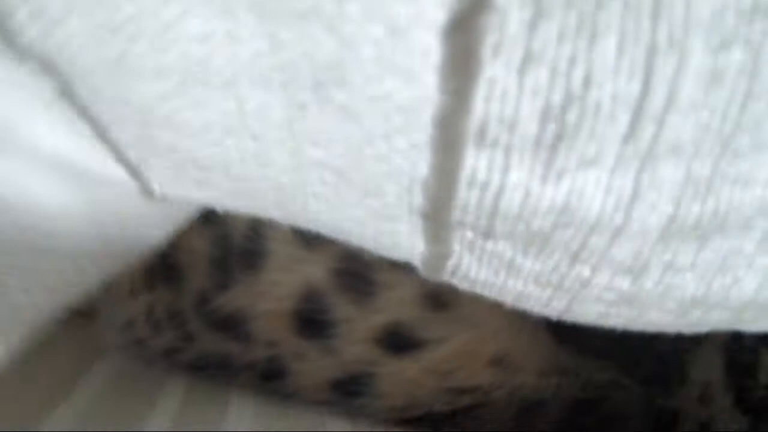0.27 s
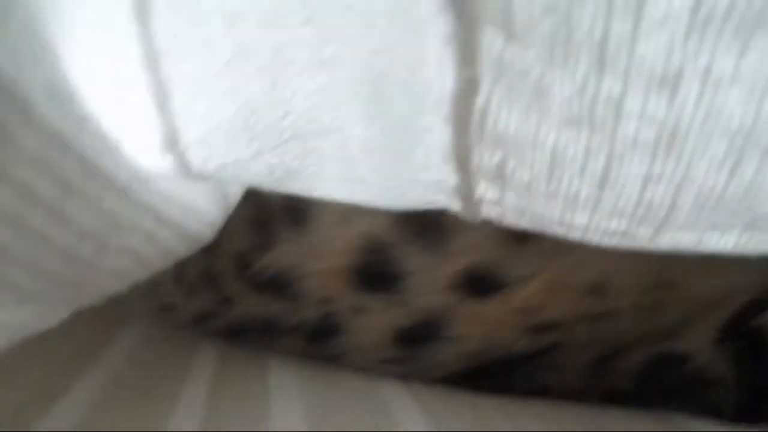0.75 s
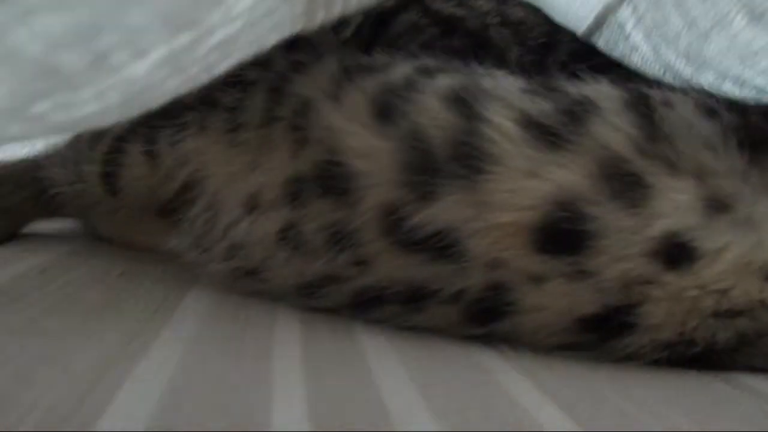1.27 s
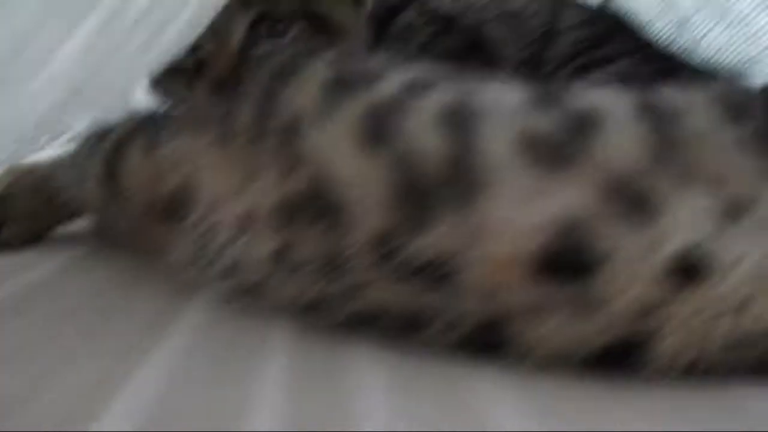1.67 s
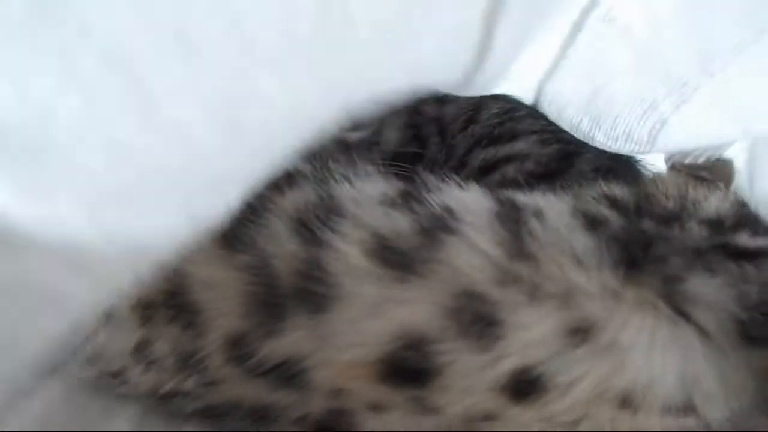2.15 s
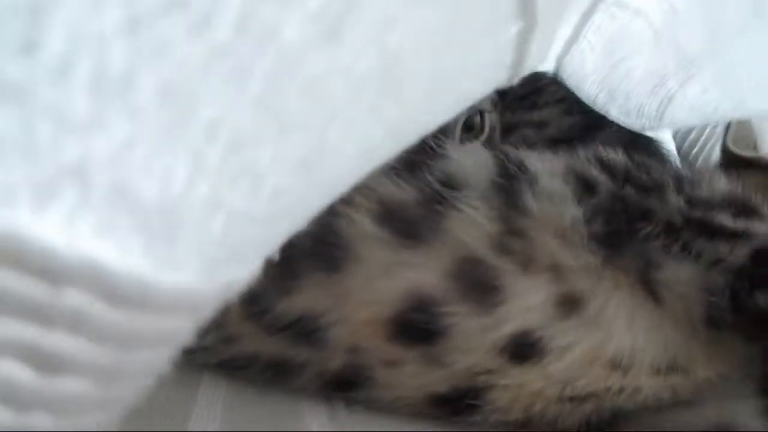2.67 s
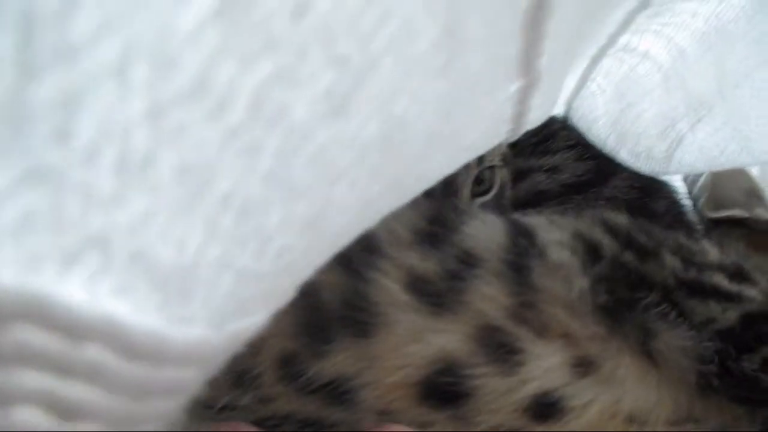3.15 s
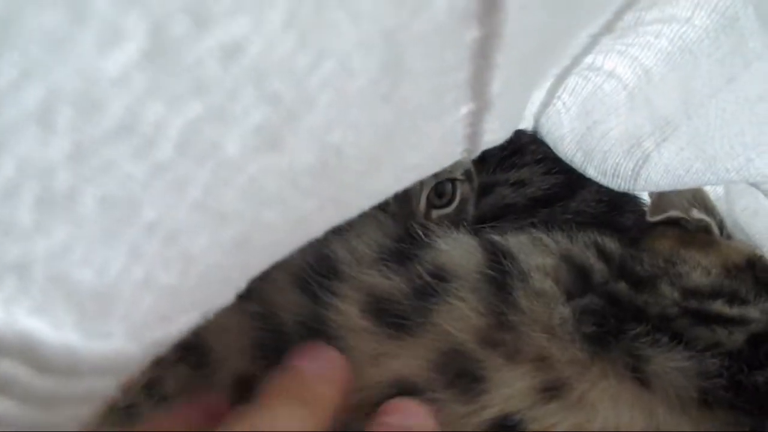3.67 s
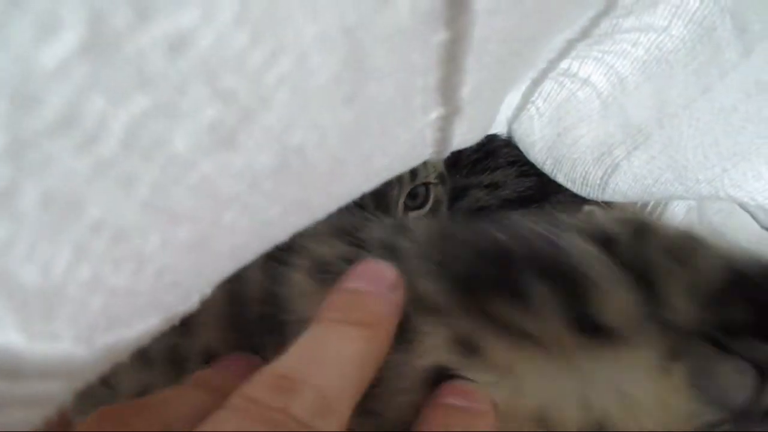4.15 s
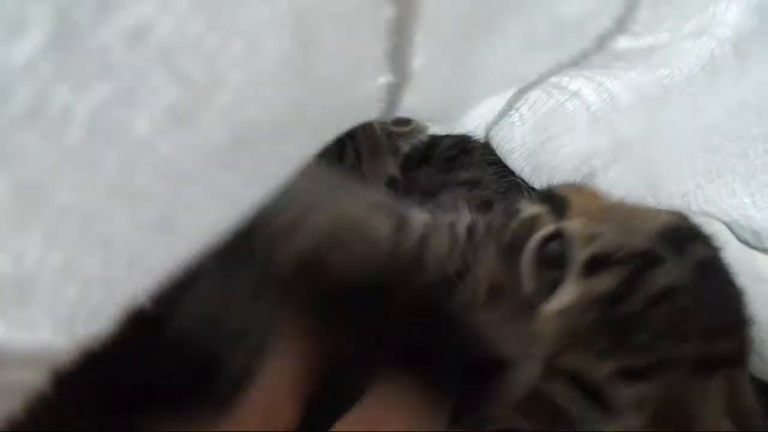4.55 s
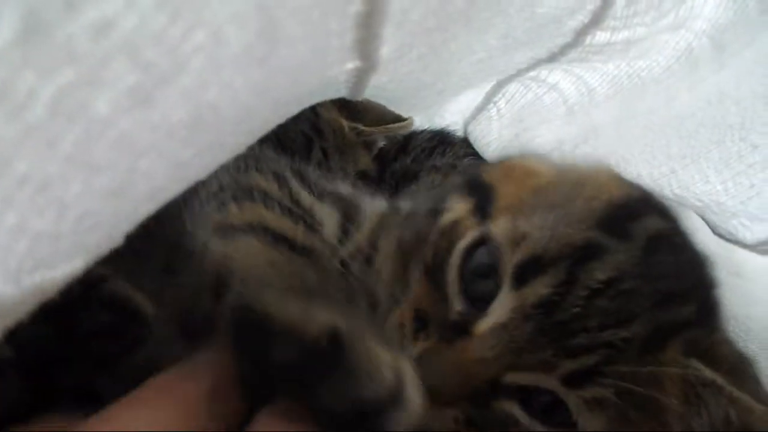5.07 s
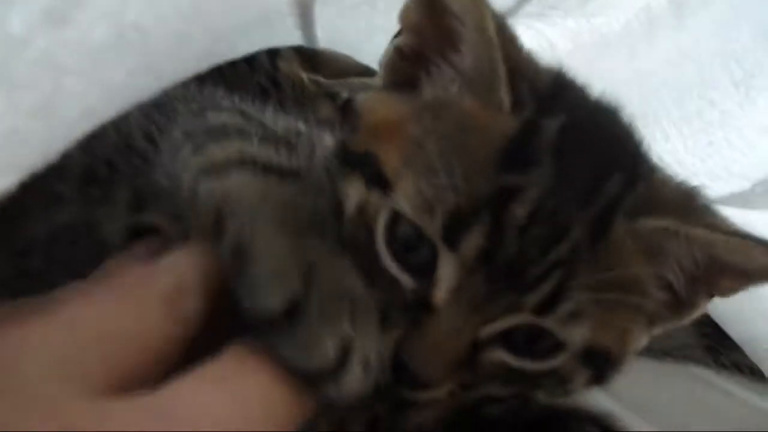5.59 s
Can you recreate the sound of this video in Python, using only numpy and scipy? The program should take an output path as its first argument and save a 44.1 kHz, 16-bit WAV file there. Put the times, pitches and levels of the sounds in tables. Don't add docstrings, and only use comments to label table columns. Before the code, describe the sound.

Very close under a sheet indoors, cloth drags over a small microphone with dry scrapes and low bumps. Dull knocks come first, then hard plastic cracks near one second and again after two and a half, the loudest distorting. After three seconds it calms to soft rustles of fingers in fur, with a few muffled knocks around four and a half. Constant hiss underneath.

```python
import sys
import numpy as np
from scipy import signal
from scipy.fft import rfft, irfft, next_fast_len
from scipy.io import wavfile
from scipy.ndimage import uniform_filter1d

SR = 44100
rng = np.random.default_rng(int(sys.argv[2]) if len(sys.argv) > 2 else 0)


def boost_factor(decibels):
    exponent = np.asarray(decibels, float) / 20
    return 10 ** exponent


def digitize_waveform(pressure):
    field = np.atleast_2d(pressure).T
    bounded = np.clip(field, -1, 1)
    quanta = np.round(bounded * 32767).astype(np.int16)
    wavfile.write(sys.argv[1], SR, quanta)


N = 256662

# [peak t/s, rise/s, fall/s, scrape level/dB,
# push level/dB]
MOVEMENTS = [(0.0, .01, 0.041, -41, -36), (.09, .03, 0.065, -41, -39.5), (0.238, 0.019, 0.042, -38.5, -56),
             (.32, .04, 0.093, -41.5, -44.5), (.49, 0.027, 0.023, -38, -37.5),
             (.55, 0.048, 0.077, -36.5, -48.5), (0.671, 0.015, 0.04, -37.5, -49),
             (.865, 0.046, 0.061, -44, -43.5), (1.02, 0.058, 0.021, -44, -39.5),
             (1.085, 0.034, 0.023, -48, -41), (1.25, 0.0086, 0.013, -45, -68), (1.35, 0.038, 0.026, -48, -50),
             (1.676, 0.05, 0.041, -43.5, -57), (1.9, 0.14, 0.11, -45.5, -47.5), (2.04, 0.0078, 0.085, -28, -23),
             (2.115, 0.036, .03, -38.5, -32), (2.175, 0.027, 0.058, -26.5, -29),
             (2.36, 0.028, 0.061, -30.5, -29.5), (2.561, 0.025, 0.23, -35.5, -31),
             (2.69, 0.024, 0.0051, -20.5, -48), (2.743, .015, 0.033, -36.5, -43),
             (2.8, 0.023, 0.0091, -33, -45), (2.96, .13, 0.058, -36, -33),
             (3.1, 0.041, 0.3, -50, -40.5), (3.47, 0.043, 0.6, -49, -45.5), (3.8, 0.011, 0.15, -43.5, -43.5),
           (4.03, .03, 0.022, -43.5, -55), (4.12, 0.024, 0.034, -43.5, -71),
           (4.2, 0.044, 0.086, -44.5, -52), (4.37, 0.048, 0.11, -40.5, -46),
           (4.5, 0.046, 0.041, -41.5, -36.5), (4.68, 0.08, 0.019, -41.5, -51),
           (4.76, 0.031, 0.13, -43.5, -64), (4.93, 0.018, 0.024, -54, -52),
           (5.05, 0.032, 0.038, -43.5, -58), (5.31, 0.075, 0.022, -49, -41), (5.421, 0.0041, .05, -46, -41),
           (5.57, 0.027, 0.034, -61, -44.5), (5.72, 0.0083, 0.081, -52, -50)]
# [peak t/s, half length/s, level/dB]
SWAYS = [(.025, 0.017, -34), (0.185, 0.095, -29), (0.317, .07, -33.5), (.49, 0.057, -31),
         (1.02, 0.028, -30), (1.39, 0.083, -35), (1.56, .03, -38.5), (1.656, 0.048, -34.5),
         (1.893, 0.1, -40.5), (2.13, 0.045, -27), (2.284, 0.059, -34.5), (2.593, 0.091, -31.5),
         (2.9, 0.11, -38), (3.466, 0.093, -40.5), (4.37, 0.036, -37.5), (4.502, 0.024, -27),
         (4.636, 0.024, -32.5), (4.746, 0.03, -36), (5.092, 0.028, -42), (5.3, 0.042, -40),
         (5.82, 0.032, -44)]
# [f/Hz, level/dB]
SCRAPE_TILT = [(900, -11), (1500, 6), (3000, -3.5), (5000, 3.5), (7500, 2.5), (10000, -4), (15000, -7.5)]
# [t/s, panel peak level/dB, panel f/Hz, port peak level/dB, t60/s]
FLEXES = [
    (0.48, -37, 2500, -35, .02),
    (0.5052, -2, 2370, -7.5, 0.013),
    (1.0965, -10, 2160, -6.5, 0.025),
    (1.1227, -21, 1800, -17, 0.011),
    (1.5107, -21.5, 2250, -35, 0.019),
    (1.5219, -7, 2180, -15.5, 0.017),
    (1.5302, -12, 2083, -29, 0.041),
    (2.6575, -21, 2300, -1.5, 0.007),
]
# [t/s, panel peak level/dB, panel f/Hz, port peak level/dB, t60/s]
BREAKS = [
    (1.0954, -15, 1490, -26, 0.012),
    (1.0992, -0.5, 2870, -25, 0.011),
    (1.1009, -6, 2970, 1, 0.014),
    (1.1045, -5.5, 2310, -8.5, 0.0077),
    (1.1061, -3, 1840, -10, 0.017),
    (1.108, -17, 1850, -52, 0.023),
]
# [t/s, panel peak level/dB, panel f/Hz, port peak level/dB, t60/s]
SPLITS = [
    (2.6446, 0, 1762, 3, 0.027),
    (2.6472, -3.5, 2230, -4.5, 0.022),
    (2.652, -14, 2450, -9, 0.038),
    (2.66, -16, 2720, -15, 0.03),
    (2.6665, -13.5, 1100, -3, 0.013),
    (2.67, -20, 2300, -19, 0.045),
]
# [t/s, panel peak level/dB, panel f/Hz, port peak level/dB, fizz level/dB]
TICKS = [(0.511, -29, 2330, -41, -43), (0.517, -18, 2640, -38, -42), (0.544, -25, 2290, -38, -51),
         (0.554, -37, 2380, -30, -52), (0.568, -28, 2620, -20, -47), (0.682, -29, 1850, -44, -50),
         (1.016, -23.5, 1900, -29, -32), (1.178, -30, 1200, -37, -53), (1.204, -24.5, 2140, -31, -48),
         (1.2505, -26, 980, -45, -56), (1.6727, -23.5, 2540, -31, -38), (1.892, -26, 2210, -26, -39),
         (2.15, -31, 1480, -33, -35), (2.196, -31, 2360, -19, -49), (2.431, -30.5, 2300, -27, -50),
         (2.563, -28, 1890, -22, -53), (2.68, -22, 2310, -24, -23), (2.688, -22, 2330, -23, -44),
         (2.961, -28, 2270, -29, -49), (4.4905, -36, 1900, -34, -44), (4.588, -38, 2340, -29, -49),
         (4.746, -38, 2700, -28, -46)]
# [t/s, panel peak level/dB, panel f/Hz, fizz level/dB]
THUDS = [
    (.505, -35, 450, -45),
    (1.1003, -13, 903, -23),
    (2.5, -28, 2240, -48),
    (2.05, -22, 526, -38),
    (2.6452, -8.5, 900, -28),
]
# [t/s, peak level/dB, start f/Hz, t60/s]
KNOCKS = [(0.0983, -9, 267, 0.21), (.172, -18.5, 171, .4), (0.305, -19.5, 203, 0.27),
          (.349, -20, 109, 0.96), (2.027, -13.5, 162, 0.19), (4.385, -19.5, 136, 0.31),
          (4.481, -22, 111, .3), (4.5, -18, 100, 0.26), (4.58, -22.5, 91, 0.32), (5.3, -36, 199, .15),
          (5.417, -38, 263, .15)]
# [t/s, length/s, pitch f/Hz, level/dB]
SQUEAKS = [
    (2.6965, .023, 2470, -28),
]
# [t/s, length/s, port level/dB, fizz level/dB]
FLICKS = [
    (0.28, 0.031, -41, -49),
    (2.148, .012, -29, -43),
    (2.646, 0.039, -32, -26.5),
    (2.685, 0.04, -34, -38),
    (2.787, 0.029, -25, -33.5),
    (2.815, 0.0049, -39, -44),
    (4.489, 0.0055, -29, -39),
]
# [t/s, length/s, pitch f/Hz, level/dB]
HUMS = [
    (1.46, 0.096, 440, -45),
    (5.72, 0.11, 401, -47),
]
# [f/Hz, width/Hz, level/dB]
PORT = [(985, 180, -12), (1731, 230, -8), (2335, 128, -3), (2544, 166, -5), (2935, 230, -8),
        (3780, 86, -2.5), (4270, 270, 0), (4675, 170, -6), (5230, 91, -15), (6110, 130, -18.5),
        (6600, 410, -22.5), (8360, 240, -23.5), (9500, 580, -16.5), (10820, 218, -21)]
# [f/Hz, level/dB]
VALLEYS = [(30, -1), (80, -22), (230, -13.5), (450, -18.5), (1300, -29.5), (2000, -23), (3300, -19.5),
           (4600, -15), (5000, -24), (5600, -41), (8500, -29), (12000, -36), (15900, -37.5), (16200, -72)]
# [f/Hz, rms level/dB]
WHINE = [(2005, -70), (6012, -77), (8020, -77), (11370, -87)]

REST_SCRAPE_DB, REST_SWISH_DB, REST_PUSH_DB, REST_SWAY_DB = -48.5, -59, -56.5, -55.5
SWISH_FROM_PUSH, SWISH_DB = 0.63, -5.5
SWISH_GROWTH, SWISH_PIVOT_DB = 0.15, -36
SQUARENESS = 1.54
FLEX_FIZZ_DB, BREAK_FIZZ_DB, SPLIT_FIZZ_DB = -26, -11.5, -6.5
TICK_T60_S, THUD_T60_S, THUD_PORT_DB = 0.028, 0.019, -44
CRACK_TAPS = 2000
ROOM_DB = -41


def evened(x):
    return x / np.sqrt(np.mean(x ** 2) + 1e-20)


def peaked(x):
    return x / abs(x).max()


def read(points, hz):
    f, value = np.transpose(points)
    return np.interp(np.log(hz + 1), np.log(f + 1), value)


def add(mix, start_s, sound):
    part = mix[round(start_s * SR):][:len(sound)]
    part += sound[:len(part)]


def band(x, lo_hz, hi_hz, order=2):
    return signal.sosfilt(signal.butter(order, [lo_hz, hi_hz], "bandpass", fs=SR, output="sos"), x)


def coloured(x, gain):
    size = next_fast_len(len(x))
    spectrum = rfft(x, size) * gain(np.fft.rfftfreq(size, 1 / SR))
    return evened(irfft(spectrum, size)[:len(x)])


def port(hz):
    peaks = sum(boost_factor(2 * db) / (1 + (2 * (hz - f) / width) ** 2) ** 1.22 for f, width, db in PORT)
    return np.sqrt(boost_factor(-14.5) * peaks + boost_factor(2 * read(VALLEYS, hz)))


def flicker(size, depth_db):
    drift = uniform_filter1d(uniform_filter1d(rng.standard_normal(N), size), size)
    return boost_factor(depth_db * evened(drift))


def fibres(per_s, spread_db, smooth):
    size = boost_factor(spread_db * np.minimum(rng.exponential(1, N), 3.3))
    clicks = evened(size * (rng.random(N) < per_s / SR))
    return evened(clicks + smooth * rng.standard_normal(N))


def swell(peak_s, rise_s, fall_s, db):
    grid = np.arange(0, N + 64, 64)
    late_s = grid[:, None] / SR - peak_s
    shape = np.exp(-abs(late_s / np.where(late_s < 0, rise_s, fall_s)) ** SQUARENESS)
    level = np.sqrt(((boost_factor(db) * shape) ** 2).sum(axis=1))
    return np.interp(np.arange(N), grid, level)


def cloth():
    peak_s, rise_s, fall_s, scrape_db, push_db = np.transpose(MOVEMENTS)
    swish_db = scrape_db + SWISH_FROM_PUSH * (push_db - scrape_db) + SWISH_DB
    swish_db = swish_db + SWISH_GROWTH * (push_db - SWISH_PIVOT_DB)
    sway_s, half_s, sway_db = np.transpose(SWAYS)

    grip = flicker(size=150, depth_db=2.5)
    threads = coloured(fibres(2000, 4.2, 1.15),
                       lambda hz: port(hz) * boost_factor(read(SCRAPE_TILT, hz)) * (hz > 500))
    folds = boost_factor(-3.0) * evened(band(fibres(600, 5.2, 1.87), 133, 770))
    weight = band(band(fibres(150, 1.7, 0.72), 52, 326), 33, 127, order=1)
    weight = boost_factor(-2.0) * evened(weight)
    springs = boost_factor(-1.9) * evened(band(rng.standard_normal(N), 5.5, 34))
    push = weight * flicker(size=600, depth_db=2.0)
    layers = np.array([grip * threads, grip * folds, push, springs])

    rest = boost_factor(np.array([REST_SCRAPE_DB, REST_SWISH_DB, REST_PUSH_DB, REST_SWAY_DB])) @ layers
    levels = [swell(peak_s, rise_s, fall_s, db) for db in (scrape_db, swish_db, push_db)]
    levels.append(swell(sway_s, half_s, half_s, sway_db))
    return rest * flicker(size=2600, depth_db=2.5), (np.array(levels) * layers).sum(axis=0)


def crack(peak_db, hz, port_db, fizz_db, t60_s):
    t = np.arange(CRACK_TAPS) / SR
    noise = rng.standard_normal(CRACK_TAPS)
    burst = noise * boost_factor(-60 * t / (0.56 * t60_s))

    def mode(f_hz, share, life):
        return share * boost_factor(-60 * t / (life * t60_s)) * np.sin(2 * np.pi * f_hz * t)

    def rung(body):
        return signal.fftconvolve(burst, body)[:CRACK_TAPS]

    panel_modes = mode(hz, 0.86, 0.6) + mode(0.83 * hz, 0.16, 0.29)
    panel_modes = panel_modes + mode(1.39 * hz, 0.16, 0.2) + mode(1.57 * hz, 0.073, 0.24)
    panel = band(rung(panel_modes), 0.7 * hz, 1.66 * hz)
    cavity_modes = mode(4230, 1, 0.64) + mode(4786, 0.3, 0.46) + mode(4000, 0.98, 0.4)
    cavity = band(rung(cavity_modes), 2970, 5160)
    fizz = band(noise * boost_factor(-60 * t / (0.24 * t60_s)), 5900, 11400)
    thump = band(burst, 220, 560)
    return (boost_factor(peak_db) * peaked(panel) + boost_factor(port_db + 1.5) * peaked(cavity)
            + boost_factor(fizz_db + 3.5) * peaked(fizz) + boost_factor(fizz_db - 8.5) * peaked(thump))


def casing_hits():
    cracks = []
    for table, fizz_db in ((FLEXES, FLEX_FIZZ_DB), (BREAKS, BREAK_FIZZ_DB), (SPLITS, SPLIT_FIZZ_DB)):
        for s, db, hz, port_db, t60_s in table:
            cracks.append((s, db, hz, port_db, port_db + fizz_db, t60_s))
    ticks = [(*row, TICK_T60_S) for row in TICKS]
    thuds = [(s, db, hz, THUD_PORT_DB, fizz_db, THUD_T60_S) for s, db, hz, fizz_db in THUDS]
    return sorted(cracks) + ticks + thuds


def knock(peak_db, hz, t60_s):
    t = np.arange(0, 0.17, 1 / SR)
    turns = np.cumsum(hz * (0.24 + 0.79 * np.exp(-t / 0.0068))) / SR
    swing = np.exp(-t / 0.0032) + 0.14 * boost_factor(-60 * t / t60_s)
    rim = 0.2 * np.exp(-t / 0.0031) * np.sin(2 * np.pi * 2.62 * turns)
    onset = np.minimum(t / 0.0049, 1)
    return boost_factor(peak_db + 5.0) * (swing * np.sin(2 * np.pi * turns) + rim) * onset


def squeak(length_s, hz, db):
    t = np.arange(round(length_s * SR)) / SR
    jitter = uniform_filter1d(rng.standard_normal(CRACK_TAPS), size=30)[:len(t)]
    turns = np.cumsum(hz * (1 + 1.5 * t + 0.03 * jitter)) / SR
    overtones_db = (-3, 1.0, -17, -30)
    stack = sum(boost_factor(level_db) * np.sin(2 * np.pi * k * turns)
                for k, level_db in enumerate(overtones_db, 1))
    return boost_factor(db) * stack * signal.windows.tukey(len(t), 0.6)


def flick(length_s, port_db, fizz_db):
    hiss = rng.standard_normal(CRACK_TAPS)[:round(length_s * SR)]
    cavity = boost_factor(port_db) * evened(band(hiss, 3750, 4850))
    fizz = boost_factor(fizz_db) * evened(band(hiss, 6100, 8700))
    return (cavity + fizz) * np.hanning(len(hiss))


def hum(length_s, hz, db):
    t = np.arange(round(length_s * SR)) / SR
    return boost_factor(db) * np.sin(2 * np.pi * hz * t) * np.hanning(len(t))


def room():
    hiss = coloured(rng.standard_normal(N), port)
    z = signal.stft(hiss, nperseg=512, noverlap=384)[2]
    patches = uniform_filter1d(rng.standard_normal(z.shape[::-1]), size=16, axis=0)
    patches = uniform_filter1d(patches, size=8, axis=1)
    z = z * boost_factor(1.36 * evened(patches).T)
    return boost_factor(ROOM_DB) * evened(signal.istft(z, nperseg=512, noverlap=384)[1][:N])


def whine():
    t = np.arange(N) / SR
    return sum(np.sqrt(2) * boost_factor(db) * np.sin(2 * np.pi * hz * t) for hz, db in WHINE)


def scene():
    air = room() + whine()
    rest, touch = cloth()
    for table, source in ((casing_hits(), crack), (KNOCKS, knock), (SQUEAKS, squeak),
                          (FLICKS, flick), (HUMS, hum)):
        for s, *row in table:
            add(touch, s, source(*row))
    return np.array([air + rest, touch])


def band_limit(x):
    return signal.sosfilt(signal.butter(12, 16550, fs=SR, output="sos"), x)


def record(dry):
    air, touch = dry
    t = np.arange(N) / SR
    power_db = 10 * np.log10(abs(uniform_filter1d(touch ** 2, size=661)) + 1e-12)
    over_db = np.clip(power_db + 15.5, 0, 11)
    held_db = np.maximum.accumulate(over_db + 48 * t) - 48 * t
    duck_db = np.interp(t - 0.006, t, held_db)
    x = np.clip(touch + air / boost_factor(duck_db), -1, 1)
    return band_limit(np.array([np.r_[0, x[:-1]], x]))


dry = scene()
out = record(dry)
digitize_waveform(out)
```